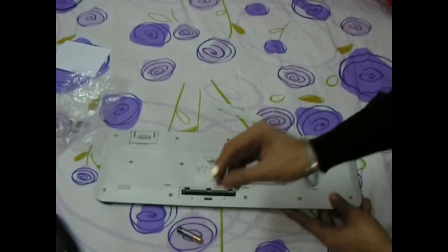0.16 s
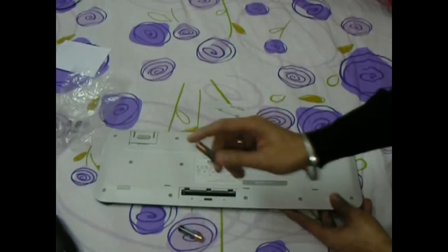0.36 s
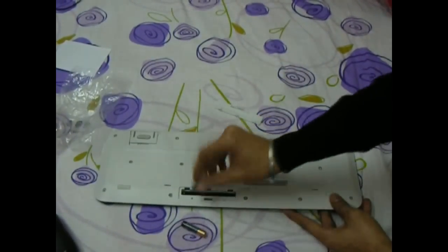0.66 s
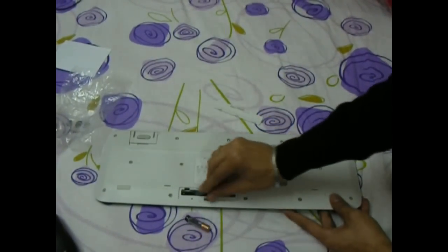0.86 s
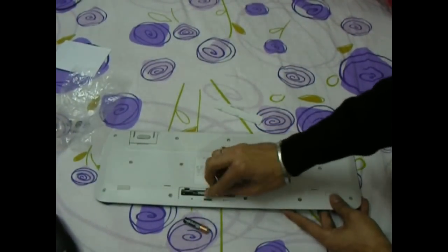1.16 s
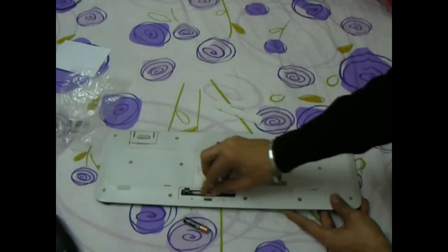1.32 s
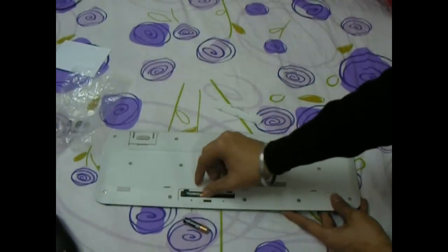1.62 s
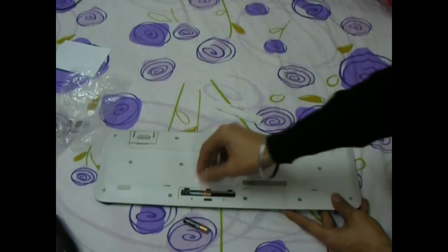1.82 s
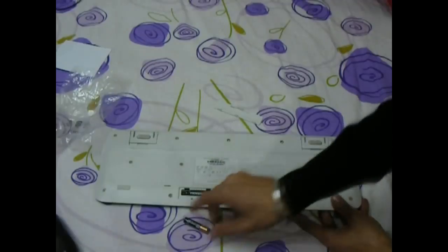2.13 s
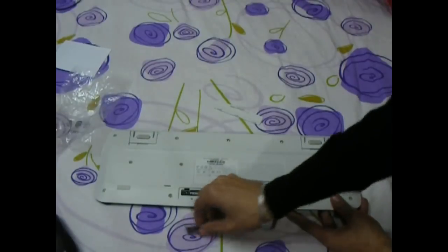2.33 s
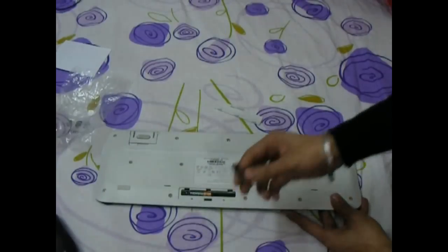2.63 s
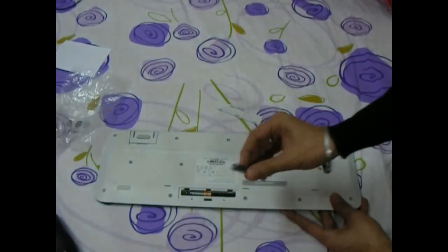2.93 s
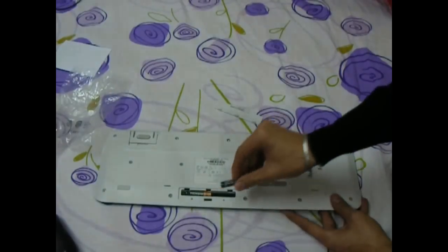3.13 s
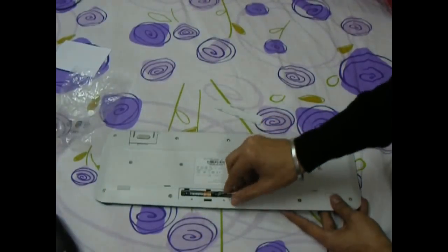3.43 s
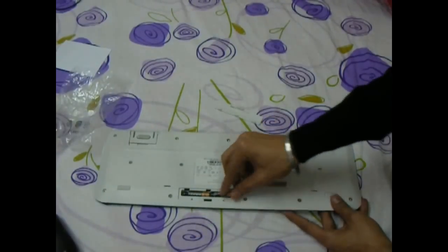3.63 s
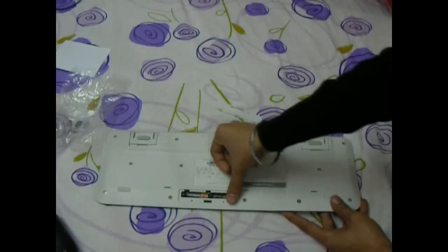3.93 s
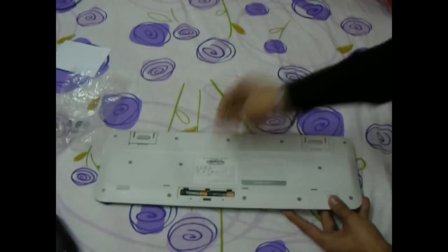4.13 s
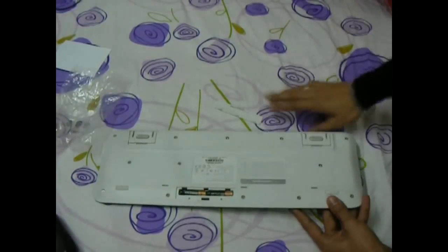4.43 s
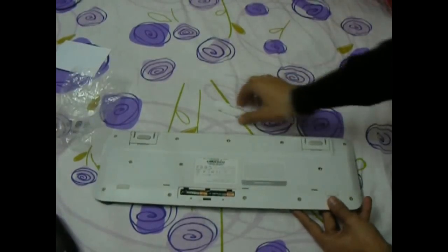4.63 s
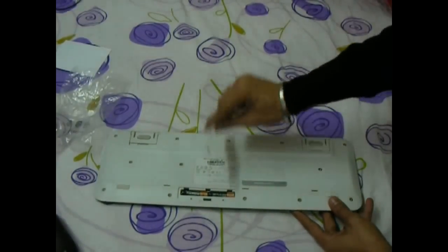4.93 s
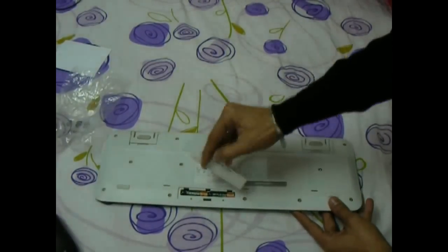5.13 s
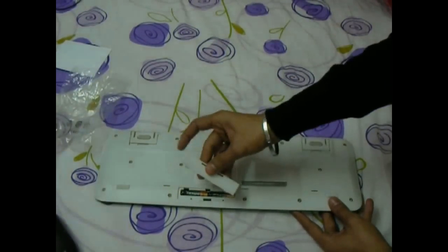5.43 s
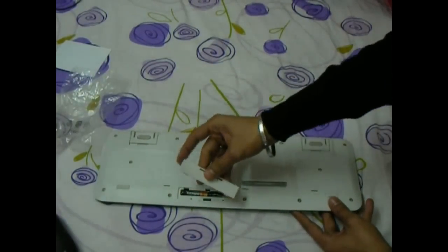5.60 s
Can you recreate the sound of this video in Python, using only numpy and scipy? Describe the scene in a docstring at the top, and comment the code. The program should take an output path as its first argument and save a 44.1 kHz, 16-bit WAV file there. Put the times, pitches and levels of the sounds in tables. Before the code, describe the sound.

Small plastic clicks and taps as batteries are pressed into a keyboard, with two louder snaps, over a steady low hiss indoors.

```python
"""Faint dry ticks sound over a steady hiss as two batteries are pressed into the back of a plastic
keyboard lying on a bed in a small room. Each taps and scrapes in its bay, then snaps home against the
spring. The impacts excite the modes of the hollow case, and the room answers with echoes and a short
tail. A brushing hand adds friction noise. The dull microphone overloads on the two big snaps."""
import sys
import numpy as np
from scipy import signal
from scipy.fft import rfft, irfft
from scipy.io import wavfile

SR = 44100
rng = np.random.default_rng(int(sys.argv[2]) if len(sys.argv) > 2 else 0)


def output_pcm(signal):
    """Save a mono or channel-first signal as 16-bit PCM at the path in sys.argv[1].

    Samples are clipped to [-1, 1] before scaling.
    """
    pcm = np.clip(np.atleast_2d(signal).T, -1, 1) * 32767
    wavfile.write(sys.argv[1], SR, np.round(pcm).astype(np.int16))


N = 254016
LIGHT_DB, LIGHT_SKID_DB = -30, -18  # force of a light touch, and how much it skids


def gain_of(db):
    """The decibel scale: amplitude grows tenfold every 20 dB."""
    return 10 ** (np.asarray(db) / 20)


def curve_at(points, hz):
    """Interpolation of a curve on a logarithmic frequency axis."""
    f, value = np.transpose(points)
    return np.interp(np.log(hz + 1), np.log(f + 1), value)


def add(mix, s, sound):
    """Superposition: a sound adds into the mix from time s."""
    part = mix[max(round(s * SR), 0):][:len(sound)]
    part += sound[:len(part)]


def noise(spectrum):
    """Spectral shaping: white noise takes on the given spectrum, at rms 1."""
    shape = gain_of(curve_at(spectrum, np.fft.rfftfreq(N, 1 / SR)))
    coloured = irfft(rfft(rng.standard_normal(N)) * shape, N)
    return coloured / coloured.std()


def low_pass(x, hz):
    """A windowed-sinc filter cuts steeply above hz."""
    return signal.oaconvolve(x, signal.firwin(255, hz, window=("kaiser", 9), fs=SR), "same")


# Spectral density of the microphone's hiss: f/Hz, relative level/dB
HISS_SPECTRUM = [(20, -12.5), (60, -10), (110, -10.5), (200, -4), (420, 0), (700, -1.5), (1000, -3.5),
                 (1500, -6.5), (2100, -10), (3000, -13.5), (4000, -24.5), (5000, -33), (6000, -45),
                 (7000, -57.5)]
def hiss(level_db=-43):
    """Stationary noise: the microphone hisses at a constant level."""
    return gain_of(level_db) * noise(HISS_SPECTRUM)


# Early reflections off nearby surfaces: delay/s, level/dB
REFLECTIONS = [(.0029, -10.5), (.0052, -12), (.0075, -25), (0.012, -11), (0.0138, -16.5), (.0165, -10.5),
               (.021, -18.5)]
# Reverberation time of the room: f/Hz, T60/s
ROOM_DECAY = [(200, 0.11), (500, 0.36), (1400, 0.24), (3500, 0.28), (7000, 0.24)]
def room(x, tail_db=-3, build_s=0.011):
    """Reverberation: early reflections, then a diffuse tail that swells and dies band by band."""
    hz, t, bands = signal.stft(rng.choice([-1., 1.], SR // 2), SR, nperseg=256)
    decay = gain_of(-60 * t / curve_at(ROOM_DECAY, hz)[:, None])
    response = signal.istft(bands * decay, SR, nperseg=256)[1]
    response *= 1 - np.exp(-(np.arange(len(response)) / SR / build_s) ** 2)
    response *= gain_of(tail_db) / np.linalg.norm(response)
    for delay, db in REFLECTIONS:
        add(response, delay, gain_of([db]))
    return signal.oaconvolve(x, response)[:N]


# Spectrum of one hard contact on the plastic: f/Hz, relative level/dB
CONTACT_SPECTRUM = [(40, -34.5), (130, -2), (300, -8), (450, 3), (800, 5.5), (1500, 5), (2000, 1),
                    (2800, -2.5), (3350, -9.5), (3850, -18), (5200, -23.5), (6500, -41.5), (8000, -78.5)]
def contact(pitch_hz, thud_db, snap_db, peak_db=9, size=2048):
    """Impulse response of a plate: a click that rings briefly at the pitch of the struck spot."""
    half_width_octaves, thud_hz, snap_hz, lag_s = 0.098, 600, 1900, 0.001109
    hz = abs(np.fft.fftfreq(size, 1 / SR)) + 1
    resonance = peak_db / (1 + (np.log2(hz / pitch_hz) / half_width_octaves) ** 2)
    bass = thud_db / (1 + (hz / thud_hz) ** 4)  # a fingertip behind the blow
    treble = snap_db / (1 + (snap_hz / hz) ** 4)  # bare metal on plastic
    db = curve_at(CONTACT_SPECTRUM, hz) + resonance + bass + treble + 20
    log_gain = db * np.log(10) / 20
    minimum_phase = np.exp(np.conj(signal.hilbert(log_gain)))  # sharp front, all ringing after it
    # bending waves disperse: treble outruns bass, and 1 kHz arrives lag_s late
    dispersion = np.exp(-4j * np.pi * lag_s * np.sqrt(1000 * hz))
    return irfft((minimum_phase * dispersion)[:size // 2 + 1])


def chatter(click, skid_db, size=512, decay_s=0.0028):
    """Sliding friction: the surfaces skid after they meet, spreading the blow's energy in time."""
    force = gain_of(skid_db) * rng.standard_normal(size) * np.exp(-np.arange(size) / SR / decay_s)
    force[0] = 1
    blow = signal.fftconvolve(click, force)
    return blow * np.linalg.norm(click) / np.linalg.norm(blow)


# Hand and sleeve brushing over sheet and case: midpoint t/s, duration/s, level/dB
BRUSH_STROKES = [(2.605, 0.1, -45.5), (4.58, 0.092, -51), (4.658, 0.17, -47), (4.968, 0.18, -47.5)]
def brushes():
    """Friction noise swells and fades with each stroke, coloured like the contacts."""
    pressure = np.zeros(N)
    for s, length, db in BRUSH_STROKES:
        add(pressure, s - length / 2, gain_of(db) * np.hanning(int(length * SR)))
    return pressure * noise(CONTACT_SPECTRUM)


# Faint ticks, about ten a second at first: t/s, force level/dB, lead of the catch/s
DRY_TICKS = [(.034, -30.5, 0.017), (.127, -30, 0.02), (0.226, -31, 0.019), (0.3177, -33, .0086),
             (.417, -25, 0.0098), (.52, -22, 0.0021), (0.6085, -29, 0.00095), (0.7093, -24, 0.00093),
             (1.014, -44, 0.00096), (5.306, -42, .001)]
def ticks(tick_hz=1204, catch_hz=2560, catch_db=-37.5, thud_db=-9, room_db=-7):
    """Light impacts: thin clicks with hardly any ring, each led by a faint, higher-pitched catch."""
    clicks = np.zeros(N)
    for s, tick_db, lead_s in DRY_TICKS:
        catch = s - lead_s, catch_db, catch_hz, 6.5
        tick = s, tick_db, tick_hz, -1 - (tick_db - LIGHT_DB)  # firmer ticks are duller
        for at, force_db, pitch_hz, snap_db in (catch, tick):
            click = contact(pitch_hz, thud_db, snap_db, peak_db=10)
            add(clicks, at, gain_of(force_db) * chatter(click, LIGHT_SKID_DB))
    return clicks + gain_of(room_db) * room(clicks)


# Modes of the hollow case: f/Hz, level at resonance over the drive/dB, T60/s
CASE_MODES = [(285, 10.5, .25), (465, 6.5, 0.077), (639, 5.5, 0.073), (760, -4, 0.44), (789, 7, 0.19),
              (851, 12, 0.11), (893, 3.5, 0.081), (928, -9, 0.11), (970, 2, 0.21), (1065, 0, 0.1),
              (1153, 8.5, 0.061), (1268, 8, 0.13), (1427, -4.5, 0.26), (1465, 1.5, 0.24), (1598, 7.5, 0.15),
              (1830, -2.5, 0.12), (1993, 6, 0.12), (2300, 7, 0.19), (2443, 6, 0.12), (2660, 5.5, .24),
              (2780, 2, 0.18), (3140, -6, 0.24), (3330, 7.5, 0.18), (4420, 0, 0.22), (5120, 5.5, 0.18)]
def case(x):
    """Modal resonance: the plastic shell rings on as a sum of damped sinusoids."""
    t = np.arange(SR // 2) / SR
    ring = np.zeros(len(t))
    for hz, db, t60 in CASE_MODES:
        damping = np.log(1000) / t60
        ring += gain_of(db) * 2 * damping / SR * np.exp(-damping * t) * np.cos(2 * np.pi * hz * t)
    return signal.oaconvolve(x, ring)[:N]


# A battery knocks in its bay: t/s, force level/dB, f/Hz, thud/dB, snap/dB, ring of case and room/dB
BAY_KNOCKS = [(1.053, -30, 285, 19.5, 10, 0.5), (1.1363, -22, 1100, -8, 2.5, 3),
              (1.234, -31.5, 600, 1, -6.5, 6), (1.2549, -31.5, 950, -9, -16, 0),
              (1.3618, -31, 1200, -10, -6, -1), (1.6401, -37.5, 890, 1, 4, 5.5),
              (1.6633, -23.5, 640, -12, 4, 2.5), (2.087, -33.5, 1050, 8, 6, 6.5),
              (2.12, -29.5, 1000, 1, -17, -6), (3.5315, -22, 430, 4, -7, 0.5),
              (3.5581, -25, 1000, -5, -4.5, 7), (3.664, -15, 1070, -8.5, -2, -3),
              (3.679, -9, 1320, -4, -0.5, 0), (3.844, -25, 2800, -5, 0.5, 1),
              (3.91, -16.5, 776, -2.5, -6.5, -2.5), (4.0102, -10, 1124, -1, 2, 1.5)]
def knocks():
    """Single impacts with friction: the harder the blow, the less it skids."""
    for s, force_db, pitch_hz, thud_db, snap_db, ring_db in BAY_KNOCKS:
        skid_db = LIGHT_SKID_DB - 0.09 * (force_db - LIGHT_DB)
        yield s, force_db, contact(pitch_hz, thud_db, snap_db), skid_db, ring_db


# A battery snaps home: t/s, force level/dB, snap/dB, seat f/Hz, creak lead/s, slip lead/s, rebound/dB
SEATING_SNAPS = [(1.44, -11, 13.5, 2480, .0117, .0069, -3), (4.1809, -3, -1.5, 862, .0188, .0036, 0.5)]
def snaps(scrape_skid_db=-8, clean_skid_db=-26):
    """Slip and elastic rebound: each snap is four blows in quick succession."""
    scrape_ring_db, hit_ring_db, rebound_ring_db = -1.5, 2.5, -0.5
    for s, force_db, snap_db, seat_hz, creak_s, slip_s, rebound_db in SEATING_SNAPS:
        creak = contact(1126, thud_db=7.5, snap_db=2)  # the bay gives under the finger
        yield s - creak_s, force_db - 18.5, creak, scrape_skid_db, scrape_ring_db
        slip = contact(1.28 * seat_hz, thud_db=-2, snap_db=0.4 * snap_db)  # sliding over the spring
        yield s - slip_s, force_db - 4, slip, scrape_skid_db, scrape_ring_db
        hit = contact(1514, thud_db=-2, snap_db=snap_db)  # the battery lands in its seat
        yield s, force_db, hit, clean_skid_db, hit_ring_db
        rebound = contact(seat_hz, thud_db=-7.5, snap_db=snap_db - 4)  # the spring throws it back
        yield s + 0.0028, force_db + rebound_db, rebound, clean_skid_db, rebound_ring_db


def batteries(case_in_room_db=-14):
    """Multipath transmission: every blow is heard directly, through the case and off the walls."""
    direct, drive = np.zeros((2, N))
    for s, force_db, click, skid_db, ring_db in [*knocks(), *snaps()]:
        blow = gain_of(force_db) * chatter(click, skid_db)
        add(direct, s, blow)
        add(drive, s, gain_of(ring_db) * blow)
    shell = case(drive)
    return direct + shell + room(drive + gain_of(case_in_room_db) * shell)


def scene():
    """Superposition of all the handling and the steady hiss, in one channel."""
    return (batteries() + ticks() + brushes() + hiss())[None]


def record(dry, mic_edge_hz=7100, dc_offset=-0.0304, knee=9, band_edge_hz=13900):
    """Soft clipping: a narrow-band microphone feeds an off-zero input that saturates at full scale."""
    x = low_pass(dry[0], mic_edge_hz) + dc_offset
    saturated = x / (1 + abs(x) ** knee) ** (1 / knee)
    return low_pass(saturated, band_edge_hz)[None]


dry = scene()
out = record(dry)
output_pcm(out)
```